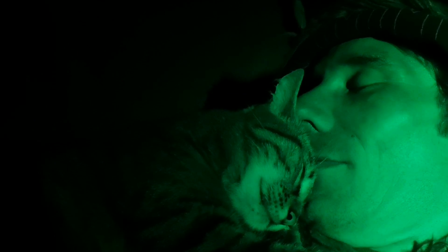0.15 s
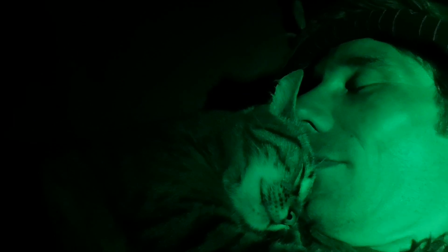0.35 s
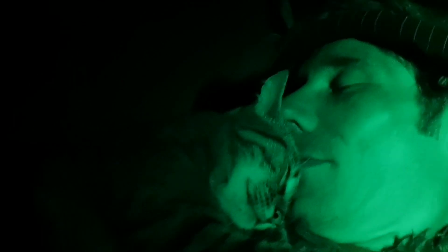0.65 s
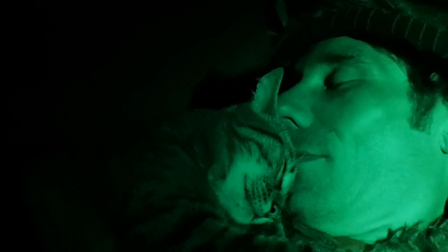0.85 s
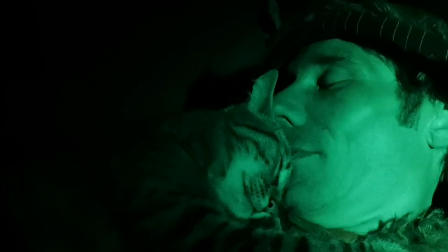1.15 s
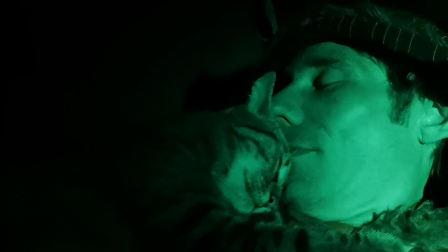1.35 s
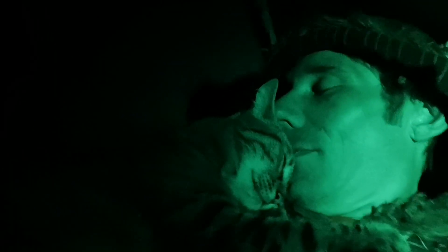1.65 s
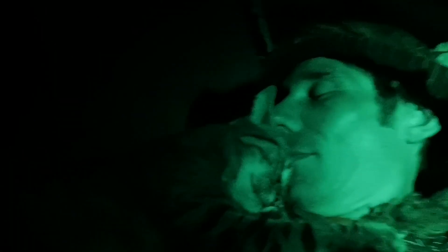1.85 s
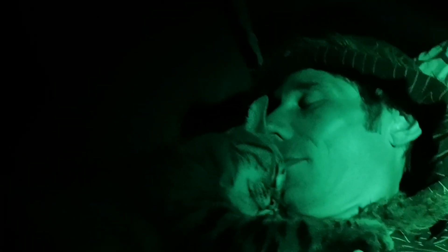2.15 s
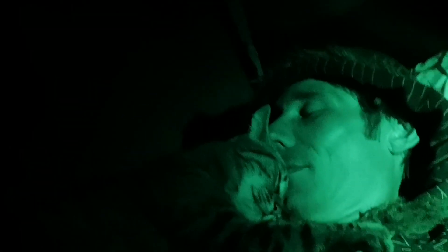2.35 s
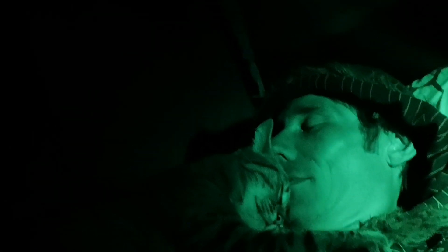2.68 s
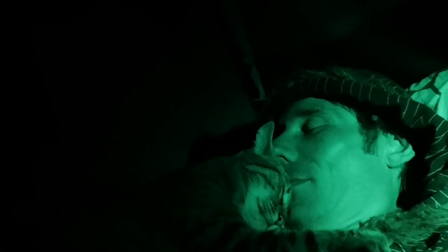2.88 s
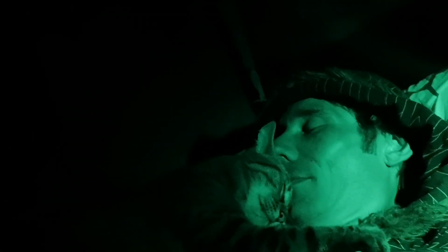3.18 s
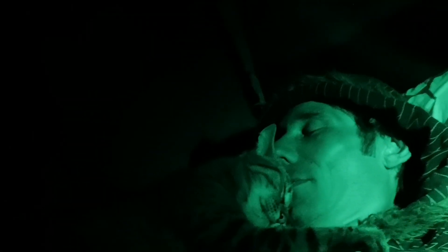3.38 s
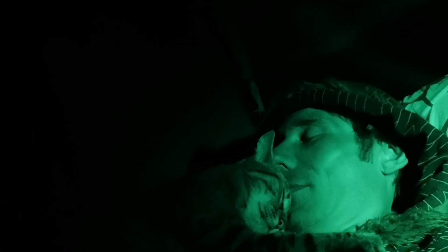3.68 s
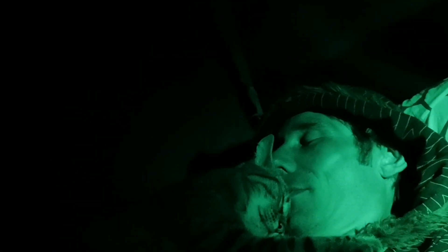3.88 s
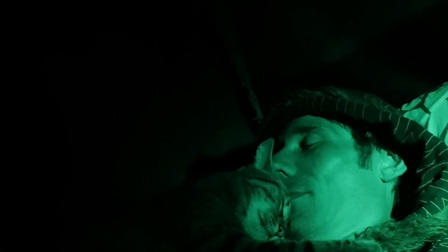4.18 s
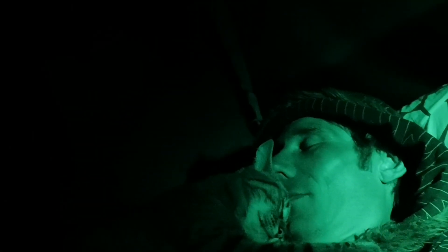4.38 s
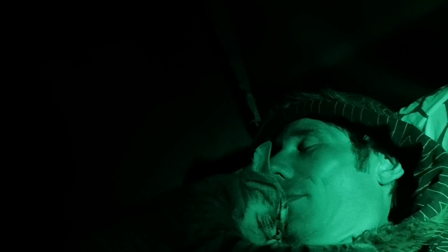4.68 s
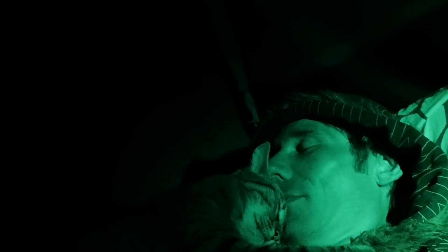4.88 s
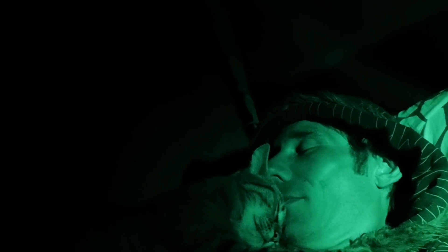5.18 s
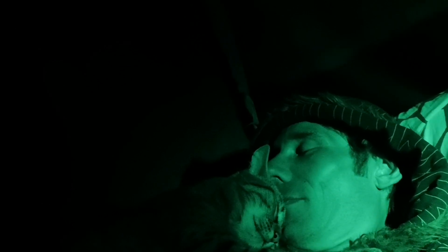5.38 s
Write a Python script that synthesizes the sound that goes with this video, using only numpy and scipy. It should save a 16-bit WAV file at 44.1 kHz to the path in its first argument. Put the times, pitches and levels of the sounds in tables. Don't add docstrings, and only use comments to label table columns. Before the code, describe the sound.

In a quiet bedroom at night, soft hiss, unsteady low rumble and a faint high motor whine come first. Skin then sticks and slips on the plastic body of a small handheld recorder, making dull thuds and rough rubbing. The rubbing breaks into crisp clicks that grow sparse. Everything is extremely close to the right microphone, with the left hearing the crackle fainter and duller. The cat and sleeping man make no sound.

```python
import sys
import numpy as np
from scipy import signal
from scipy.io import wavfile
from scipy.ndimage import uniform_filter1d

SR = 44100
rng = np.random.default_rng(int(sys.argv[2]) if len(sys.argv) > 2 else 0)


def nominal_scale(level):
    x = np.asarray(level, float) / 20
    return 10 ** x


def waveform_to_disk(signal):
    frames = np.transpose(np.atleast_2d(signal))
    scaled = np.clip(frames, -1, 1) * 32767
    samples = np.round(scaled).astype(np.int16)
    wavfile.write(sys.argv[1], SR, samples)


N = 244225

# centre in Hz, width in Hz, level in dB.
AIR = (12000, 9000, -40)
PORT_CUT_HZ = 8100


def rms_one(x):
    return x / np.sqrt(np.mean(x ** 2) + 1e-20)


def at_hz(points, hz):
    points_hz, values = np.transpose(points)
    return np.interp(np.log(hz), np.log(points_hz), values)


def low(x, hz, order):
    return signal.sosfilt(signal.butter(order, hz, fs=SR, output="sos"), x)


def later(x, ms):
    return np.interp(np.arange(N) - ms * SR / 1000, np.arange(N), x)


def clicks_at(s, size):
    out = np.full(N, 1e-18)
    np.add.at(out, np.round(s * SR).astype(int), size)
    return out


def ring(clicks, hz, t60):
    r = nominal_scale(-60 / (t60 * SR))
    w = 2 * np.pi * hz / SR
    return signal.lfilter([0, np.sin(w)], [1, -2 * r * np.cos(w), r * r], clicks)


def resonance(x, hz, width_hz):
    r = np.exp(-np.pi * width_hz / SR)
    w = 2 * np.pi * hz / SR
    return signal.lfilter(np.array([1, 0, -1]) * (1 - r * r) / 2, [1, -2 * r * np.cos(w), r * r], x)


def background():
    # frequency in Hz, density in dB per Hz.
    floor = [(12, -30), (20, 12.5), (85, 0.5), (153, -15.5), (197, -39), (233, -28.5), (326, -30.5),
             (431, -44), (482, -35), (524, -40), (2120, -36), (6290, -48.5), (6840, -39.5), (8310, -55),
             (15800, -50.5)]
    # frequency in Hz, correlation from -1 to 1.
    likeness = [(30, 0.95), (100, 0.99), (160, 0.21), (300, -0.53), (600, -0.86), (1200, 0.22),
                (2500, -0.062), (5000, -0.066)]
    # centre in Hz, width in Hz, gain in dB.
    right_port = (6200, 1400, -2.7)
    # time in seconds, rumble level in dB.
    tremor = [(0.0, -64.5), (0.6, -57), (0.9, -62), (1.3, -60.5), (1.651, -48.5), (2.25, -58.5), (2.4, -56),
              (2.7, -55), (2.818, -59.5), (3.0, -52.5), (3.5, -63), (3.95, -64.5), (4.5, -63), (4.9, -62.5),
              (5.54, -67.5)]
    settle = 8000
    edges = 18 * 2 ** np.arange(0, 10.1, .5)
    white = rng.standard_normal((2, 2, N + settle))
    hiss = rumble = 0
    for k, (bottom, top) in enumerate(zip(edges, edges[1:])):
        band_pass = signal.butter(2, [bottom, top], "band", fs=SR, output="sos")
        mid, side = signal.sosfilt(band_pass, white[k % 2])[:, settle:]
        hz = np.sqrt(bottom * top)
        alike = np.clip(at_hz(likeness, hz), -1, 1)
        stereo = np.sqrt(1 + alike) * mid + np.sqrt(1 - alike) * side * [[1], [-1]]
        band = nominal_scale(at_hz(floor, hz)) * stereo
        if k > 5:
            hiss = hiss + band
        else:
            rumble = rumble + band
    hz, width_hz, lift_db = right_port
    hiss[1] += nominal_scale(lift_db) * resonance(hiss[1], hz, width_hz)
    s, db = np.transpose(tremor)
    lumps_db = 4 * rms_one(low(rng.standard_normal(N), 7, order=2))
    rumble = rms_one(rumble * nominal_scale(lumps_db))
    return nominal_scale(-72.5) * rms_one(hiss) + nominal_scale(np.interp(np.arange(N) / SR, s, db)) * rumble


def whine():
    # pitch in Hz, wander in Hz, left level in dB, right level in dB.
    motor = (6890, 4, -100, -86)
    hz, wander_hz, left_db, right_db = motor
    pitch = hz + wander_hz * rms_one(low(rng.standard_normal(N), 11, order=1))
    tone = np.sin(2 * np.pi * np.cumsum(pitch) / SR)
    return np.outer(nominal_scale([left_db, right_db]), rms_one(tone))


def slips():
    # time in seconds, jolt in dB, knock in dB, length in ms.
    drags = [(0.7781, -29, -26, 5.5), (0.7996, -36, -44, 6.1), (0.8313, -38, -40.5, 5.5),
             (0.9836, -34.5, -35, 4.2), (1.011, -36.5, -39.5, 5.2), (1.1584, -37.5, -33, 2.26),
             (1.177, -38.5, -44, 9.6), (1.2022, -46, -55, 2.3), (1.2469, -33.5, -31.5, 6),
             (1.3674, -36, -30.5, 5.9), (1.4109, -38, -31, 13), (1.4269, -36, -39, 8.9),
             (1.4589, -38, -34.5, 10), (1.4752, -37, -37, 9.3), (1.492, -35, -37.5, 8.2),
             (1.5237, -36.5, -33, 16), (1.5375, -35, -38, 11.4), (1.5741, -33, -34, 13),
             (1.5903, -37.5, -40, 5.3), (1.625, -61, -55, 7.2), (1.6597, -34.5, -31.5, 16),
             (1.7138, -34.5, -36, 6.4), (1.7308, -47, -38.5, 7.3)]
    # time in seconds, jolt, rasp and crackle in dB.
    chatter = [(1.7471, -38, -41, -44), (1.763, -36, -40, -66), (1.7726, -46, -41, -34),
               (1.7974, -55, -50, -69), (1.8112, -38, -53, -41.5), (1.8204, -44, -42.5, -61),
               (1.8408, -38, -42, -48), (1.858, -53, -49, -66), (1.9324, -44, -45.5, -58),
               (1.9529, -40, -47, -37.5), (1.99, -58, -48, -54), (2.0561, -64, -42.5, -70),
               (2.0788, -42, -49.5, -51), (2.092, -55, -49, -66), (2.1219, -47, -46, -73),
               (2.148, -58, -47.5, -70), (2.157, -42, -50, -50), (2.1696, -71, -48.5, -69),
               (2.197, -54, -50.5, -68), (2.293, -44.5, -44, -52.5), (2.366, -62, -49, -69),
               (2.4408, -49, -46, -58), (2.8732, -58, -57, -68), (4.2516, -42.5, -53.5, -56)]
    # time in seconds, knock, rasp and crackle in dB, length in ms.
    snaps = [(2.3815, -40, -34, -32, 4.1), (2.429, -55, -39, -33, 2.4), (2.461, -45.5, -37, -35, 2.6),
             (2.5976, -39.5, -38, -30.5, 3.6), (2.6202, -52, -37, -40.5, 8.7), (2.7292, -47, -39.5, -43, 4),
             (2.7515, -41.5, -44.5, -43, 2.1), (2.9116, -49.5, -42, -42, 2.3), (3.0081, -49, -42, -34, 2.2),
             (3.0257, -37, -40, -32.5, 2.9), (3.0472, -40, -36, -26.5, 1.2), (3.0644, -35, -29, -26, 1.8),
             (3.0813, -31.5, -40, -26.5, 3.3), (3.1468, -44, -36, -31.5, .6),
             (3.2175, -45, -36, -26.5, 1.9), (3.3645, -45, -36, -30.5, 2.3),
             (3.6059, -36.5, -31, -25.5, 2.5), (3.913, -50, -34, -26, 1.6), (4.2582, -36.5, -27, -18, 1.3),
             (4.6402, -36, -31, -20.5, 1.5), (5.3601, -33.5, -32, -15, 1.1)]
    # time in seconds, rasp in dB, crackle in dB.
    ticks = [(0.9911, -55, -54), (1.6096, -63, -52), (1.62, -61, -43), (1.7206, -46, -35),
             (1.913, -37, -42.5), (2.0032, -56, -54), (2.2882, -47, -53), (2.6312, -30.5, -33.5),
             (2.777, -57.5, -70), (2.9215, -38, -39), (2.99, -37.5, -36), (3.2098, -55, -52),
             (3.3594, -49.5, -41), (3.555, -57, -59), (3.7171, -59.5, -64), (3.9035, -58, -56),
             (3.9284, -40.5, -73), (4.4797, -45, -72), (4.5246, -64, -48.5)]
    rows = [(s, jolt, knock, jolt - 8, -19 + 0.7 * knock, ms) for s, jolt, knock, ms in drags]
    rows += [(s, jolt, rasp - 4, rasp, crack, 5.5) for s, jolt, rasp, crack in chatter]
    rows += [(s, -23 + 0.31 * crack, knock, rasp, crack, ms) for s, knock, rasp, crack, ms in snaps]
    rows += [(s, rasp - 25, rasp - 12.5, rasp, crack, 1.4) for s, rasp, crack in ticks]
    return rows


def struck(modes, s, db):
    return sum(np.outer([left, right], ring(clicks_at(s + ms / 1000, nominal_scale(db)), hz, t60))
               for hz, t60, left, right, ms in modes)


def jolts():
    # frequency in Hz, t60 in seconds, left gain, right gain, start in ms.
    body_modes = [(38.6, .081, .53, .58, -1.97), (79.2, .031, 6.42, 7.16, -1.85),
                  (78.7, .027, -7.82, -7.84, -1.87), (178, .013, .23, -1.7, -.8)]
    back_modes = [(197, 0.022, 0.91, 1.63, -1.26), (109, 0.068, -0.31, -0.053, 0.48),
                  (348, 0.017, 0.055, 0.33, -1.18)]
    wall_modes = [(515, 0.026, -0.64, 0.75, 0.44), (490, 0.014, -0.53, -0.86, -0.35),
                  (773, 0.0058, 0.27, -1.31, -0.38), (810, 0.012, -0.54, 0.3, -0.15)]
    wall_top_modes = [(1410, 0.01, -0.088, -0.88, -0.12)]
    # start in seconds, end in seconds.
    backstroke = (2.36, 2.61)
    # frequency in Hz, t60 in seconds, left dB, right dB, share of crispness.
    loose_part = (233.5, 0.65, -39.5, -37, 0.25)
    s, jolt_db, knock_db, _, crackle_db, _ = np.transpose(slips())
    hz, t60, left_db, right_db, share = loose_part
    crispness_db = crackle_db - knock_db
    hum = ring(clicks_at(s, nominal_scale(jolt_db + share * crispness_db)), hz, t60)
    back = (s > backstroke[0]) & (s < backstroke[1])
    body = struck(body_modes, s[~back], jolt_db[~back] + 1.0)
    body += struck(back_modes, s[back], jolt_db[back])
    body += np.outer(nominal_scale([left_db, right_db]), hum)
    wall = low(struck(wall_modes, s, knock_db), 1450, order=2)
    wall += low(struck(wall_top_modes, s, knock_db - 2.5), 2200, order=2)
    return low(body, 480, order=2) + wall


def knocks():
    # frequency in Hz, t60 in seconds, level in dB.
    panel = [(1400, .005, -7), (2300, .004, -11)]
    s, rasp_db = np.transpose(slips())[[0, 3]]
    spread_db = 3 * rng.standard_normal((len(s), len(panel)))
    rings = np.zeros(N)
    for k, (hz, t60, db) in enumerate(panel):
        rings += ring(clicks_at(s - .0004, nominal_scale(rasp_db + db + spread_db[:, k])), hz, t60)
    return -low(rings, 3500, order=2)


def colour(x, peaks):
    return sum((-1) ** k * nominal_scale(db) * resonance(x, hz, w) for k, (hz, w, db) in enumerate(peaks))


def dull(x):
    # centre in Hz, width in Hz, level in dB.
    dull_peaks = [(970, 640, -4.5), (1686, 946, 2.5), (2407, 1460, -1)]
    hz, width_hz, db = AIR
    air = nominal_scale(db) * resonance(resonance(x, hz, width_hz), hz, width_hz)
    return low(colour(x, dull_peaks), PORT_CUT_HZ, order=6) + air


def bright(x):
    # centre in Hz, width in Hz, level in dB.
    bright_peaks = [(3480, 1200, -7.5), (5340, 960, 2.5), (7195, 1640, -2.5)]
    return low(colour(x, bright_peaks), PORT_CUT_HZ, order=7)


def crackle():
    length, lead = 2000, 400
    out = np.zeros(N)
    t_ms = (np.arange(length) - lead) * 1000 / SR
    for s, _, _, rasp_db, crackle_db, ms in slips():
        swell_db = 13 * t_ms
        fall_db = -12 * abs(t_ms / np.maximum(ms - 1, .25)) ** 1.3
        burst = rng.standard_normal(length) * nominal_scale(np.where(t_ms < 0, swell_db, fall_db))
        burst[lead] -= 9 / ms
        high, mid = bright(burst), dull(burst)
        at = round(s * SR) - lead
        out[at:at + length] += nominal_scale(crackle_db + 4.5) * high / abs(high).max()
        out[at:at + length] += nominal_scale(rasp_db + 2.5) * mid / abs(mid).max()
    return out


def rubbing():
    # start in seconds, end in seconds, first level in dB, last level in dB.
    strokes = [(1.154, 1.279, -65, -80), (1.4, 1.453, -63, -68), (1.457, 1.511, -54, -62),
               (1.514, 1.552, -66, -55), (1.561, 1.571, -80, -58), (1.614, 1.66, -61, -58.5),
               (1.657, 1.785, -50.5, -48.5), (1.773, 1.872, -57.5, -64), (1.91, 1.969, -60.5, -50.5),
               (1.969, 2.008, -46.5, -74), (2.053, 2.122, -53, -75.5), (2.128, 2.209, -60, -64.5),
               (2.377, 2.403, -51.5, -59), (2.42, 2.46, -73, -58), (2.587, 2.644, -60, -54),
               (2.644, 2.676, -57, -77.5), (2.723, 2.779, -57, -68), (2.898, 2.924, -78, -43),
               (2.925, 2.952, -58, -76), (2.984, 3.03, -59, -62), (3.03, 3.071, -69, -55),
               (4.521, 4.54, -59, -82)]
    # centre in Hz, width in Hz, level in dB.
    murmur = (620, 440, -3.5)
    t, strength = np.arange(N) / SR, np.zeros(N)
    for start, end, first_db, last_db in strokes:
        level_db = np.interp(t, [start, end], [first_db, last_db])
        strength += nominal_scale(level_db) * (t > start) * (t < end)
    grain_db = 3.5 * np.minimum(rng.exponential(1, N), 5)
    flutter_db = 2.4 * rms_one(low(rng.standard_normal(N), 380, order=1))
    grain = rng.standard_normal(N) * nominal_scale(grain_db + flutter_db)
    rubbed = grain * uniform_filter1d(strength, size=130)
    hz, width_hz, murmur_db = murmur
    body = nominal_scale(murmur_db) * resonance(resonance(rubbed, hz, width_hz), hz, width_hz)
    air = nominal_scale(-24) * resonance(rubbed, *AIR[:2])
    return (bright(rubbed) + nominal_scale(2.5) * dull(rubbed) + air + body) / np.std(bright(grain))


def scene():
    # knock gain in dB, crackle gain in dB, crackle cut in Hz.
    far_side = (-12, -15, 1800)
    knock_db, crackle_db, cut_hz = far_side
    knock, rough = knocks(), crackle() + rubbing()
    through_shell = nominal_scale(knock_db) * knock + nominal_scale(crackle_db) * low(rough, cut_hz, order=1)
    left = later(through_shell, ms=.65)
    return np.array([left, knock + rough]) + jolts() + background() + whine()


def low_pass(x):
    return signal.sosfilt(signal.butter(12, 15760, fs=SR, output="sos"), x)


def record(dry):
    mix = signal.sosfilt(signal.cheby2(12, 50, 16000, fs=SR, output="sos"), dry)
    return low_pass(mix)


dry = scene()
out = record(dry)
waveform_to_disk(out)
```